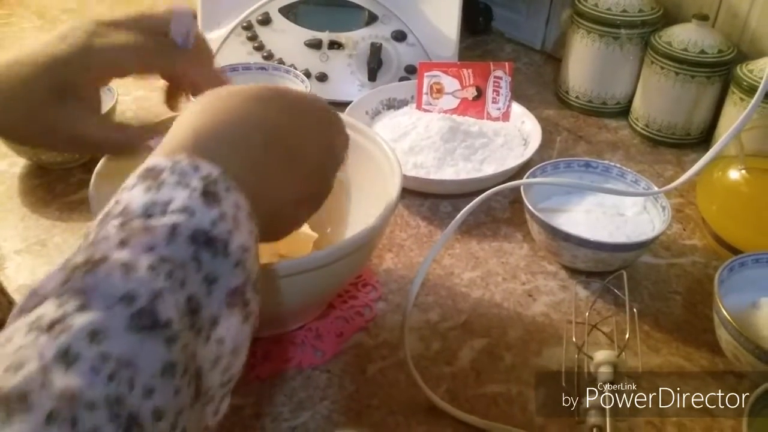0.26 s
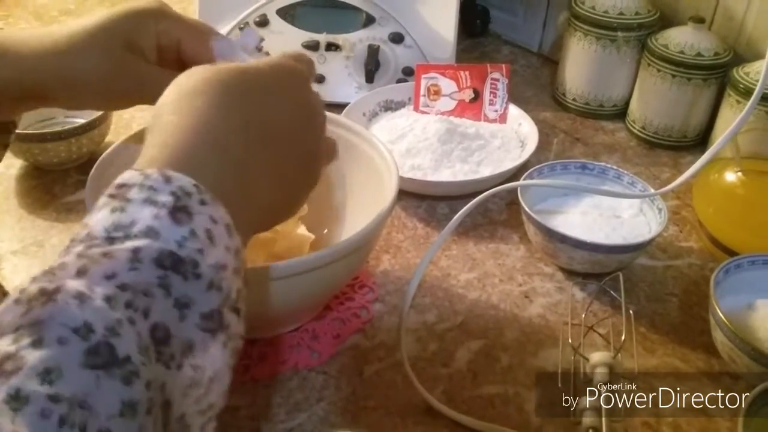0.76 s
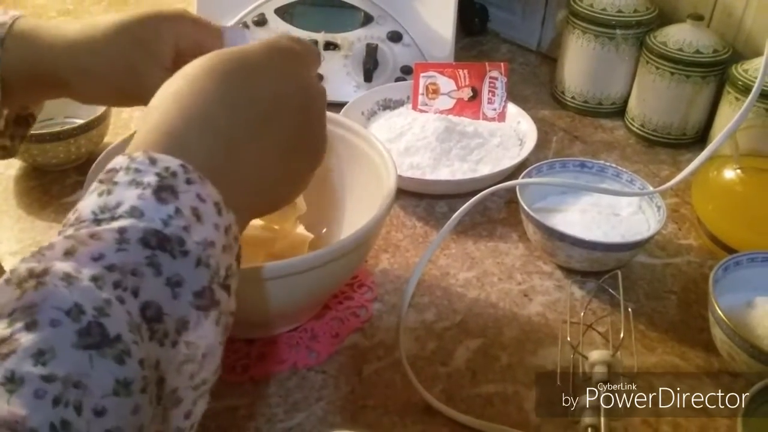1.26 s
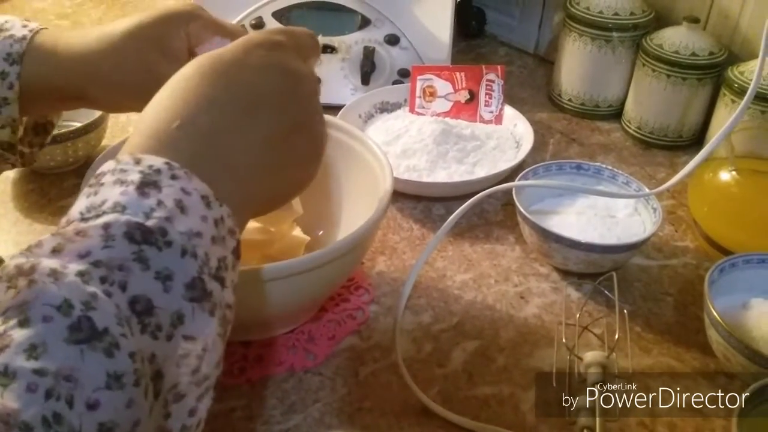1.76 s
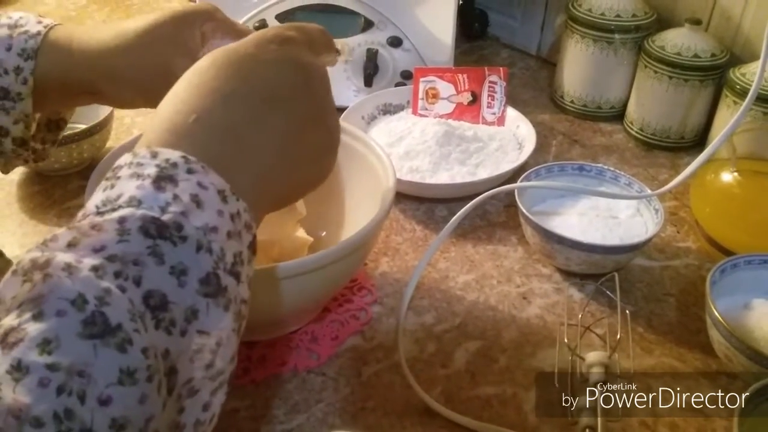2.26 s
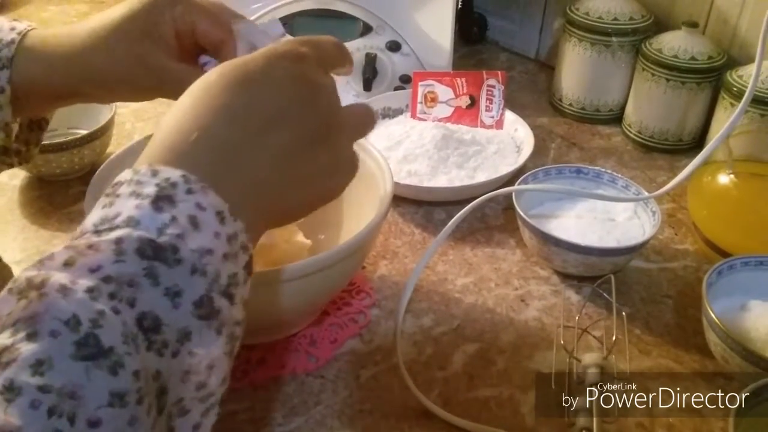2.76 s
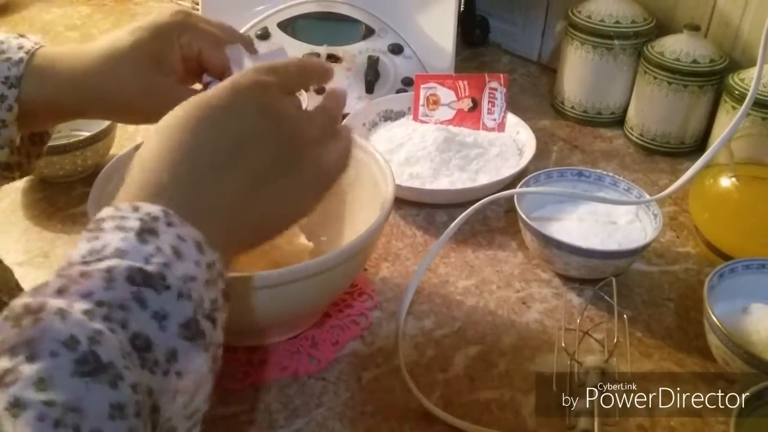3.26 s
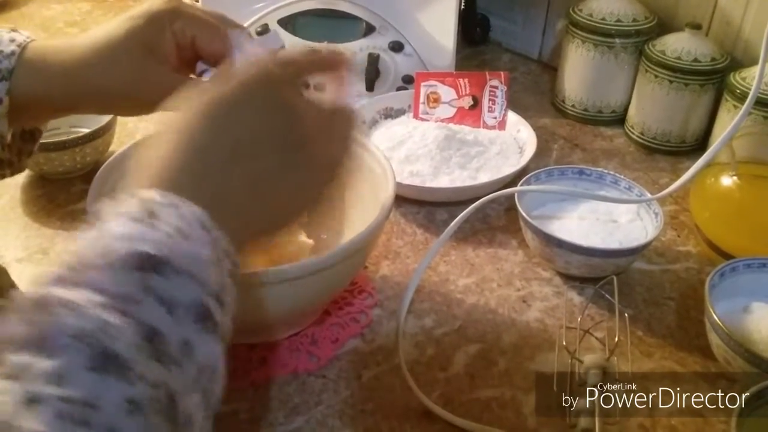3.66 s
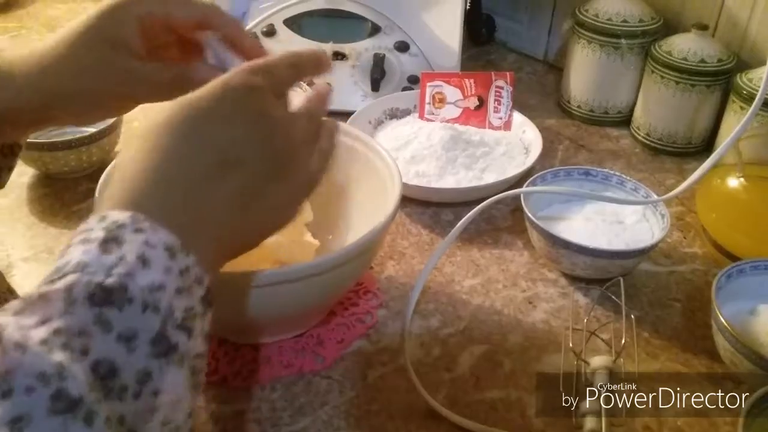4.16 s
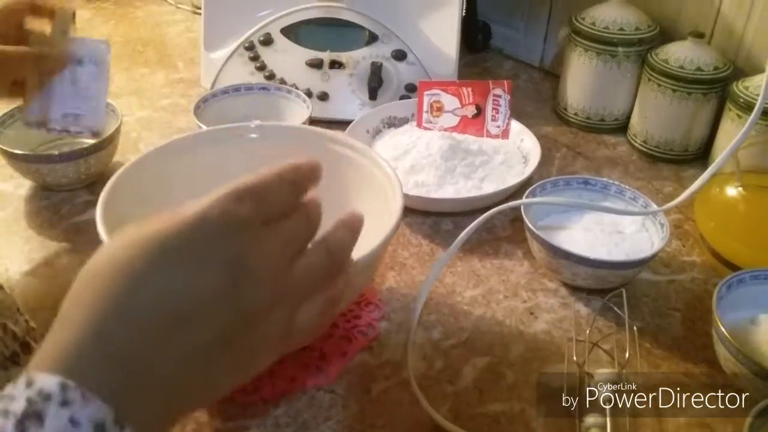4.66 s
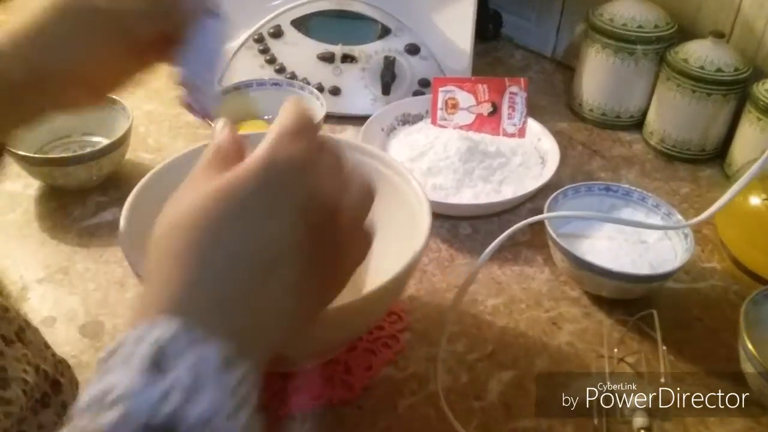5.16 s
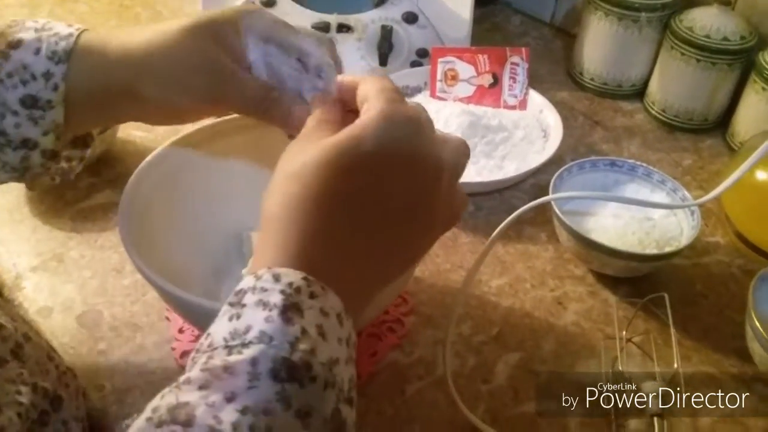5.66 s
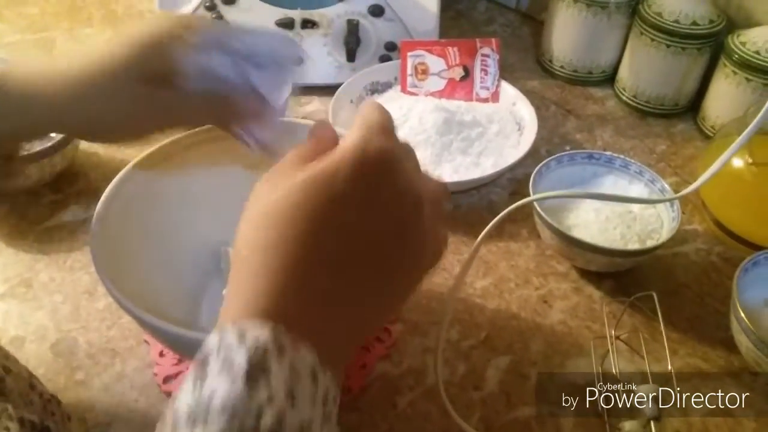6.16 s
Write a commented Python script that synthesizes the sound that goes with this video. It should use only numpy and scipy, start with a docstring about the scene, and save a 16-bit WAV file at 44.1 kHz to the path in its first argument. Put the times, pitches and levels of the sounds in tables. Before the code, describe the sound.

Close, dry paper crackling: a little packet is rubbed, shaken empty and crumpled, with soft hand bumps and a very quiet appliance hum.

```python
"""A faint motor hum and still air come first, with the quiet hiss of held paper; soon creases snap and crumple.
Fingers open and empty a small paper sachet over a mixing bowl: the sheet rubs, ticks and squeaks, with soft bumps.
Snaps and rubbing are shaped noise bursts and noise; hum, squeaks and the dull part of the bumps are sine waves.
The bowl, the counter and the kitchen answer the paper.
One small microphone with a port resonance in the treble hears it all."""
import sys
import numpy as np
from scipy import signal
from scipy.fft import rfft, irfft, next_fast_len
from scipy.io import wavfile
from scipy.ndimage import map_coordinates

SR = 44100
rng = np.random.default_rng(int(sys.argv[2]) if len(sys.argv) > 2 else 0)


def materialize(psi):
    """Save the field psi as 16-bit PCM at rate SR to the path in sys.argv[1].

    A 1-D psi becomes a single channel; in a 2-D psi each row is a channel.
    """
    bounded = np.clip(np.atleast_2d(psi).T, -1, 1)
    quanta = np.round(bounded * 32767).astype(np.int16)
    wavfile.write(sys.argv[1], SR, quanta)


N = 282240  # length in samples

# Hum on multiples of the motor's shaft speed: [multiple, level/dB]
MOTOR_HUM = [(2, -80), (3, -65.5), (4, -77.5), (5, -53), (6, -64.5), (7, -78), (9, -82.5), (11, -83)]
# Thin electronic tones: [f/Hz, level/dB]
ELECTRONIC_TONES = [(9920, -81.5), (9300, -86)]
# Colour of the still room air: [f/Hz, relative level/dB]
AIR_SPECTRUM = [(20, -28), (40, -15), (75, -0.5), (130, 0), (260, 2.5), (400, -6.5), (700, -7), (1100, -10),
                (2000, -12.5), (4000, -23.5), (8000, -27.5), (15500, -18)]
# How long the kitchen's echo takes to fall by 60 dB: [f/Hz, t/s]
KITCHEN_DECAY = [(200, 0.8), (1000, 0.47), (3000, 0.25), (7000, 0.27), (15000, 0.12)]
# Mixing bowl and counter ringing along: [f/Hz, width/Hz, level/dB]
BOWL_MODES = [(621, 18, -4), (684, 7.9, -8.5), (1217, 2.3, 4.5), (1383, 4.3, 6), (2380, 29, -12),
              (2830, 11, -8)]
# Soft bumps of hands and sachet, levels before the common gains in scene():
# [start t/s, level/dB, pitch f/Hz, swell t/s, rumble level against the bump/dB]
SOFT_BUMPS = [(2.112, -50, 595, 0.0029, 2), (3.08, -44, 810, 0.0037, -16), (3.717, -56, 275, 0.016, 8.5),
              (3.756, -46, 128, 0.024, -14), (3.79, -52.5, 342, 0.009, 1), (5.173, -59.5, 1180, 0.003, -33),
              (5.548, -45, 1214, 0.005, -30), (5.842, -42.5, 225.4, 0.021, -1.5),
              (5.9, -49.5, 245.9, 0.044, -4)]
# Colour of the bumps' low rumble: [f/Hz, relative level/dB]
RUMBLE_SPECTRUM = [(25, -39), (60, -5), (110, -6), (220, 1), (400, -8), (700, -12.5), (1500, -38)]
# Faint squeaks as the rubbing stops: [start t/s, end t/s, pitch f/Hz, level/dB]
PAPER_SQUEAKS = [(2.623, 2.91, 6347, -74.5), (2.704, 2.8, 7009, -82), (2.82, 2.92, 7009, -80)]
# The long slide while the sachet is emptied: [t/s, hiss level before the common gains/dB]
LONG_SLIDE = [(1.1, -72), (1.244, -61), (1.712, -59.5), (1.82, -50.5), (2.042, -47.5), (2.238, -51),
              (2.48, -47), (2.558, -46.5), (2.686, -51.5), (2.758, -62), (2.876, -69), (2.95, -92)]
# Short strokes of the fingers, levels before the common gains in scene():
# [peak t/s, swell t/s, fade t/s, hiss level/dB, flexing level/dB]
FINGER_STROKES = [(0.24, 0.084, 0.088, -67, -65), (0.39, 0.033, 0.055, -75, -67),
                  (0.69, 0.11, 0.038, -66.5, -65), (0.9, 0.11, 0.06, -63, -59),
                  (1.05, 0.033, .06, -66.5, -64.5), (2.37, 0.017, 0.043, -60.5, -57),
                  (3.33, 0.061, 0.2, -72, -63), (3.8, 0.1, .035, -71, -61.5),
                  (3.98, 0.071, .05, -73, -59.5), (4.49, 0.049, 0.072, -69, -66),
                  (4.82, .05, 0.23, -100, -79), (5.47, 0.048, 0.23, -73, -77),
                  (5.85, 0.065, .06, -69.5, -80), (6.13, 0.022, 0.014, -55, -48.5),
                  (6.27, .035, 0.035, -61, -57.5)]
# Colours of the rubbing hiss and of the flexing sheet: [f/Hz, relative level/dB]
HISS_SPECTRUM = [(1500, -26.5), (3000, -2.5), (5000, 1), (6500, 0), (8000, -4), (11000, -7), (15500, -5.5)]
FLEX_SPECTRUM = [(200, -8.5), (450, -8.5), (680, -8), (1030, -7), (1500, -6), (2300, -0.5), (3300, -4.5),
                 (5000, -20), (10000, -45)]
# Creases giving way, level before the common gain in scene(); low, mid and air are against that level:
# [t/s, level/dB, low level/dB, mid level/dB, air level/dB, crumple decay t/s]
CREASES = [(0.198, -41, -2, 3, -72, .0055), (0.274, -54, 13, 1, -24, 0.015),
           (0.6165, -44.5, 12, 3.5, -7, 0.01), (0.7148, -43.5, -21, -31, -13.5, 0.0036),
           (0.7727, -45.5, -11, -7, -12, 0.0091), (0.9768, -39.5, -3, -3, -19, 0.007),
           (1.4026, -55.5, 14, 10.5, -3, 0.0074), (1.435, -49.5, -3, -3.5, -6.5, 0.03),
           (1.6712, -49, 3, 11, -11, 0.013), (1.6962, -42, -3, 5, -15, 0.0068),
           (1.8786, -43.5, 5, 2, -8, 0.0094), (1.908, -41, -3, -0.5, -8, .007),
           (1.9365, -49, 4, 15.5, -13, 0.0046), (1.9884, -38.5, -1, 3.5, -5.5, 0.0087),
           (2.001, -35.5, -8, -6, -11, 0.013), (2.1137, -54.5, 14.5, 12, -8, 0.016),
           (2.1526, -41, -23, -2.5, -13, 0.022), (2.2923, -39, 7, 0.5, -5.5, 0.048),
           (2.3911, -33, -6, -5.5, -5.5, 0.0074), (2.4375, -51.5, 2, -2, 1, 0.0098),
           (2.83, -59.5, 23, 4.5, -11, 0.022), (2.8936, -58, 5, -18, -7, 0.0076),
           (3.0805, -49.5, 18, 3, -37, 0.014), (3.096, -44.5, -7, 2, -22, 0.0044),
           (3.1903, -42.5, 7.5, -8, -21, 0.0066), (3.251, -44, 14, 5.5, -22, .014),
           (3.2573, -35, 6, -3, -16.5, 0.0073), (3.277, -43.5, -5, 14, -19, 0.0085),
           (3.412, -42, 13, 2.5, -10, 0.0098), (3.425, -39.5, -16, 13, -17, 0.0067),
           (3.523, -42.5, 4, 3, -14, 0.0061), (3.532, -46, 18, 4.5, -19, 0.006),
           (3.5817, -41, 9, 2, -9.5, 0.0072), (3.5914, -38, 4.5, 2.5, -20, 0.016),
           (3.718, -39.5, 9.5, 3.5, -12.5, 0.0081), (3.769, -39, 2, 5, -20, 0.024),
           (3.897, -34.5, -2, 12.5, -9.5, 0.0025), (3.906, -37, 5.5, 4.5, -13, 0.01),
           (3.952, -42, 8.5, 5, -17, 0.016), (4.0246, -39.5, 1.5, 0.5, -18.5, 0.0079),
           (4.35, -56, 15, 9.5, -11, 0.014), (4.3941, -32, -1.5, -1, -10, 0.003),
           (4.441, -45, 2, 3, -31, .008), (5.1727, -74.5, 24, 23.5, -5, 0.0067),
           (5.4942, -45.5, 13, 2.5, -16, .009), (5.5469, -35.5, 0, 5, -17.5, 0.0069),
           (5.702, -44, 10.5, 0, -19, .004), (5.741, -53, 13, 7, -3, 0.047),
           (5.792, -40, 8, 6.5, -1.5, 0.0087), (5.8235, -45, 11, 3, -12, .008),
           (5.9011, -33, 2, 5.5, -18.5, 0.0051), (5.9626, -50, -1, 12, -7, 0.034),
           (5.9916, -28.5, 0, -16, -29, 0.004), (5.9985, -28.5, -4, 5, -15, 0.0066),
           (6.1096, -40.5, 10.5, -14, -15, 0.027), (6.132, -47, 1, 6.5, -9, .017),
           (6.2797, -49, 9, 1, -23, 0.01), (6.3525, -46.5, 11, 1.5, -8.5, 0.057)]
# Colour shared by all snaps of the sheet: [f/Hz, relative level/dB]
SHEET_SPECTRUM = [(100, -30), (300, -8.5), (480, -3.5), (700, -1.5), (1000, -7.5), (1500, -0.5),
                  (2200, 1.5), (3000, 0.5), (4100, 1.5), (5200, 2.5), (7500, 4.5), (10000, 3), (15500, 8.5)]
# The microphone's fade at the top: [f/Hz, level/dB]
TOP_FADE = [(13000, 0), (15600, -8.0)]

MOTOR_HZ = 48.5  # shaft turns a second
SLIDE_DB, SLIDE_FLEX_DB = -10, -5  # gain of the long slide; its flexing against its hiss
SLIDE_EDGE_S = 0.02  # fade at both ends of the slide
HOLD_HISS_DB, HOLD_FLEX_DB = -78.5, -74.5  # paper merely held, before the common gains
TICKS_PER_S, TICK_S = 150, 0.00083  # stray crackles: rate at the hardest slide, decay
TICK_DB, TICK_SPREAD_DB = -8.5, 4  # their level against the hiss, scatter of their sizes
STRAIN_S = 0.008  # straining before a crease gives way
SWELL = 0.17  # rise time of a crumple as a part of its decay time
CLEAN_S = 0.0053  # a crease that crumples this briefly puts half its energy into the first snap
POUCH_HZ, PANEL_HZ = 622, 2530  # the whole pouch and a single panel ring near these
RING_OCTAVES = 0.18  # scatter of those pitches as the grip changes
TOP_HZ = 15700  # nothing is heard above this


def amp(db):
    """Turn decibels into a gain."""
    return 10 ** (np.asarray(db) / 20)


def unit(x):
    """Scale x to an rms of 1."""
    return x / np.sqrt(np.mean(x ** 2) + 1e-20)


def one_energy(x):
    """Scale x to an energy of 1."""
    return x / np.sqrt(np.sum(x ** 2) + 1e-20)


def along(points, hz):
    """Read between (Hz, value) points on a log frequency axis."""
    f, v = np.transpose(points)
    return np.interp(np.log(hz + 1), np.log(f), v)


def wobble(rate):
    """A smooth random curve through this many random knots a second."""
    knots = rng.standard_normal(int(N * rate / SR) + 4)
    return map_coordinates(knots, [np.arange(N) * rate / SR])


def filtered(x, response):
    """Multiply the spectrum of x by a response over frequency."""
    m = next_fast_len(N + SR // 2)
    return irfft(rfft(x, m) * response(np.fft.rfftfreq(m, 1 / SR)), m)[:N]


def coloured(x, spectrum):
    """Shape x with a (Hz, dB) spectrum and scale it to an rms of 1."""
    return unit(filtered(x, lambda hz: amp(along(spectrum, hz))))


def causal(gain, size=1024):
    """The promptest impulse response with this gain over frequency (minimum phase)."""
    cepstrum = irfft(np.log(gain(np.fft.rfftfreq(size, 1 / SR)) + 1e-6))
    # fold the second half onto the first, so nothing sounds before the start
    cepstrum[1:size // 2] *= 2
    cepstrum[size // 2 + 1:] = 0
    return irfft(np.exp(rfft(cepstrum)))


def resonance(f, centre_hz, width_hz):
    """Response of one damped ringing mode, 1 at its centre."""
    return 1j * f * width_hz / (centre_hz ** 2 - f * f + 1j * f * width_hz)


def add(track, s, sound):
    """Mix a sound into the track at time s."""
    part = track[max(round(s * SR), 0):][:len(sound)]
    part += sound[:len(part)]


def appliance(drift_hz, waver_db, air_db):
    """A motor hums on multiples of its slightly drifting shaft speed, over the still air of the room."""
    t = np.arange(N) / SR
    turns = np.cumsum(MOTOR_HZ + drift_hz * wobble(3.05)) / SR
    hum = np.zeros(N)
    for multiple, db in MOTOR_HUM:
        level = amp(db + waver_db * wobble(4.4))
        hum += level * np.sin(2 * np.pi * (round(multiple) * turns + rng.random()))
    whine = sum(amp(db) * np.sin(2 * np.pi * hz * t) for hz, db in ELECTRONIC_TONES)
    air = amp(air_db) * coloured(rng.standard_normal(N), AIR_SPECTRUM)
    return np.sqrt(2) * (hum + whine) + air


def kitchen(x, wet_db, build_s):
    """Add a diffuse echo that builds up and dies away, soonest in the high treble."""
    hz, t, bins = signal.stft(rng.standard_normal(SR // 2), SR, nperseg=256)
    decay = amp(-60 * t / along(KITCHEN_DECAY, hz)[:, None])
    tail = signal.istft(bins * decay, SR, nperseg=256)[1]
    build = 1 - np.exp(-np.arange(len(tail)) / SR / build_s)
    tail = amp(wet_db) * one_energy(tail * build)
    tail[0] = 1  # the direct sound
    return signal.fftconvolve(x, tail)


def bowl(x):
    """The bowl under the hands sings faintly: damped modes ring along with x."""
    return filtered(x, lambda f: 1 + sum(amp(db) * resonance(f, hz, width) for hz, width, db in BOWL_MODES))


def bumps(rumble_db, tone_db):
    """Soft contacts swell and fade: a dull tone inside a low rumble."""
    track, t = np.zeros(N), np.arange(SR // 4) / SR
    for s, db, hz, swell_s, noise_db in SOFT_BUMPS:
        rumble = coloured(rng.standard_normal(N), RUMBLE_SPECTRUM)[:len(t)]
        tone = np.sqrt(2) * np.sin(2 * np.pi * hz * t)
        body = amp(rumble_db + noise_db) * rumble + amp(tone_db) * tone
        swell = t / swell_s * np.exp(1 - t / swell_s)  # reaches 1 after swell_s
        add(track, s, amp(db) * body * swell)
    return track


def squeaks(waver_hz):
    """The slowing fingers catch on the paper in thin wavering tones."""
    track = np.zeros(N)
    for start, end, hz, db in PAPER_SQUEAKS:
        swell = np.hanning(max(round((end - start) * SR), 2))
        tone = np.sin(2 * np.pi * np.cumsum(hz + waver_hz * wobble(119)) / SR)
        add(track, start, amp(db) * np.sqrt(2 * swell) * tone[:len(swell)])
    return track


def sliding():
    """Gains of hiss and flexing over time: powers of held paper, a long slide and finger strokes add up."""
    t = np.arange(N) / SR
    s, db = np.transpose(LONG_SLIDE)
    outside_s = np.abs(t - np.clip(t, s[0], s[-1]))
    slide = amp(np.interp(t, s, db) + SLIDE_DB) * np.exp(-outside_s / SLIDE_EDGE_S)
    hiss_power = amp(HOLD_HISS_DB) ** 2 + slide ** 2
    flex_power = amp(HOLD_FLEX_DB) ** 2 + (amp(SLIDE_FLEX_DB) * slide) ** 2
    for peak, swell_s, fade_s, hiss_db, flex_db in FINGER_STROKES:
        stroke = np.exp(-((t - peak) / np.where(t < peak, swell_s, fade_s)) ** 2)
        hiss_power += amp(hiss_db) ** 2 * stroke
        flex_power += amp(flex_db) ** 2 * stroke
    return np.sqrt(hiss_power), np.sqrt(flex_power)


def fibres(rate, spread_db, smooth):
    """Tiny slips of paper fibres at random times and sizes, over their own diffuse wash of noise."""
    happens = rng.random(N) < rate / SR
    sizes = amp(spread_db * np.clip(rng.standard_normal(N), -2, 2))
    slips = happens * rng.standard_normal(N) * sizes
    return unit(slips) + smooth * rng.standard_normal(N)


def rubbing(hiss_db, flex_db, unsteady_db):
    """The sheet slides in an unsteady grip; tiny folds tick, more often when it slides hard."""
    hiss, flex = sliding()
    grip = amp(unsteady_db * wobble(110) + wobble(35))
    t = np.arange(SR // 50) / SR
    fold = one_energy(rng.standard_normal(len(t)) * np.exp(-t / TICK_S))
    tick_rate = TICKS_PER_S * np.sqrt(hiss / hiss.max())
    tick_starts = fibres(rate=tick_rate, spread_db=TICK_SPREAD_DB, smooth=0)
    ticks = amp(TICK_DB) * signal.fftconvolve(tick_starts, fold)[:N]
    hissing = unit(fibres(rate=2000, spread_db=2.0, smooth=1.0))
    bright = amp(hiss_db) * hiss * coloured(hissing + ticks, HISS_SPECTRUM)
    flexing = fibres(rate=930, spread_db=-0.5, smooth=2.0)
    dark = amp(flex_db) * flex * coloured(flexing, FLEX_SPECTRUM)
    return kitchen(grip * (bright + dark), wet_db=-8.0, build_s=0.0027)[:N]


def crease(decay_s, share, snap_s, clump_db, near_db, near_s, strain_db, settle_db, settle_s):
    """A crease strains, buckles and crumples in clumps; bowl and counter throw it back; stray folds settle."""
    t = np.arange(SR // 8) / SR

    def noise():
        return rng.standard_normal(len(t))

    lead = np.linspace(0, 1, round(STRAIN_S * SR))
    strain = one_energy(rng.standard_normal(len(lead)) * lead ** 2)
    snap = one_energy(noise() * np.sqrt(t) * np.exp(-t / snap_s))
    # clumps: the loudness jitters along random knots
    knots = np.clip(rng.standard_normal(140), -2, 1.6)
    clumps = amp(clump_db * np.interp(t, np.linspace(0, t[-1], len(knots)), knots))
    rise = 1 - np.exp(-t / (SWELL * decay_s))
    crumple = one_energy(noise() * clumps * np.exp(-t / decay_s) * rise)
    near = one_energy(noise() * clumps * t * np.exp(-t / near_s))
    settle = one_energy(noise() * clumps ** 2 * np.exp(-t / settle_s))
    # a clean snap gives little warning and leaves little to crumple
    warning = amp(strain_db) * np.sqrt(1 - share) * strain
    buckle = np.sqrt(share) * snap + np.sqrt(1 - share) * crumple
    return np.concatenate([warning, buckle + amp(near_db) * near + amp(settle_db) * settle])


def snaps(gain_db, ring_db, ring_width):
    """Each crease has its own tone; pouch and panel ring briefly; the shorter the crumple, the cleaner the snap."""
    track = np.zeros(N)
    for s, db, low_db, mid_db, air_db, decay_s in CREASES:
        tone = [(700, low_db), (2400, mid_db), (5800, 0), (10500, air_db), (15000, 1.36 * air_db)]
        rings_hz = np.array([POUCH_HZ, PANEL_HZ]) * 2 ** (RING_OCTAVES * rng.standard_normal(2))

        def colour_gain(hz):
            rings = sum(resonance(hz, centre, ring_width * centre) for centre in rings_hz)
            return amp(along(SHEET_SPECTRUM, hz) + along(tone, hz)) * np.abs(1 + amp(ring_db) * rings)

        share = 1 / (1 + (decay_s / CLEAN_S) ** 2.1)  # part of the energy in the first snap
        burst = crease(decay_s, share, snap_s=0.00025, clump_db=2.5, near_db=-11.5, near_s=0.004,
                       strain_db=-12.0, settle_db=-11.0, settle_s=0.042)
        paper = signal.fftconvolve(burst, causal(colour_gain))
        in_room = kitchen(paper, wet_db=-9.5, build_s=0.0033)
        add(track, s - STRAIN_S, amp(db + gain_db) * in_room)
    return track


def scene():
    """Appliance, bumps and paper over the bowl, the same on both channels."""
    background = appliance(drift_hz=0.023, waver_db=-0.5, air_db=-64.0)
    contacts = bumps(rumble_db=1.5, tone_db=-2.5)
    paper = squeaks(waver_hz=29.8)
    paper += rubbing(hiss_db=4.0, flex_db=-0.5, unsteady_db=2.5)
    paper += snaps(gain_db=25, ring_db=-2.5, ring_width=0.12)
    mono = background + contacts + bowl(paper)
    return np.array([mono, mono])


def record(dry):
    """The microphone port rings in the treble; the top fades, then stops; the converter has a slight offset."""
    def microphone(f):
        port = 1 + 3.75 * resonance(f, centre_hz=6553, width_hz=627)
        return port * amp(along(TOP_FADE, f)) * (f < TOP_HZ)

    offset = -0.0006  # of full scale
    return np.array([filtered(x, microphone) for x in dry]) + offset


dry = scene()
out = record(dry)
materialize(out)
```